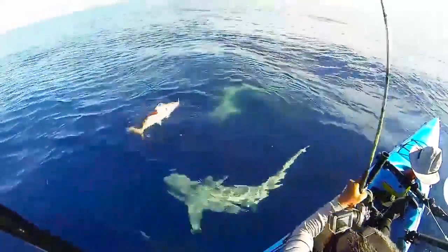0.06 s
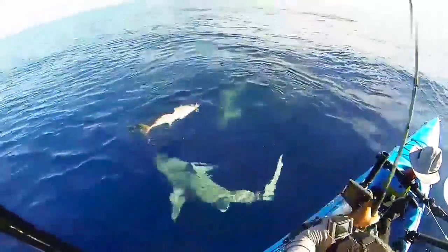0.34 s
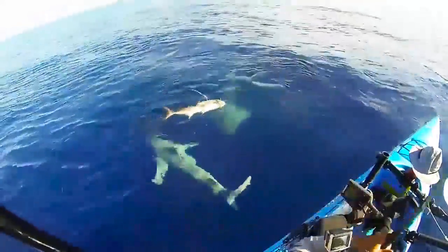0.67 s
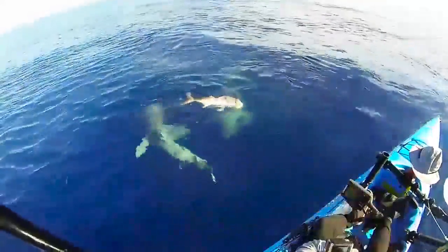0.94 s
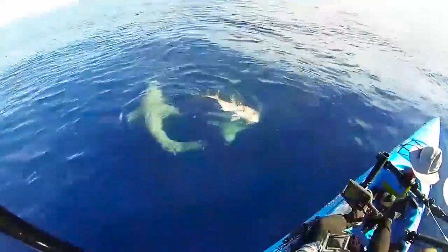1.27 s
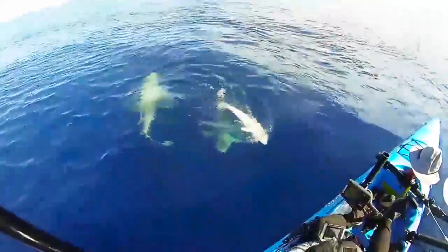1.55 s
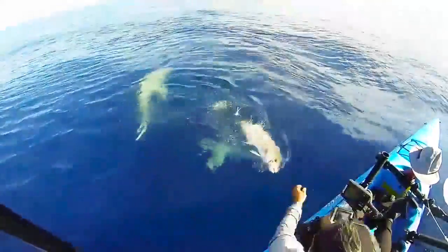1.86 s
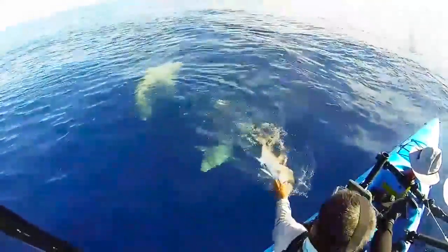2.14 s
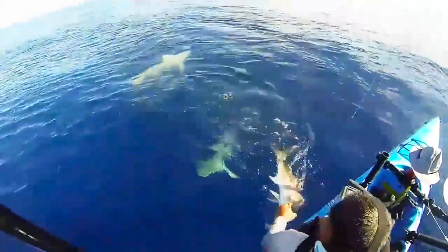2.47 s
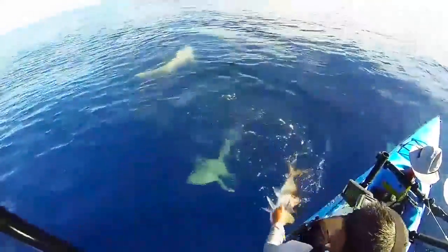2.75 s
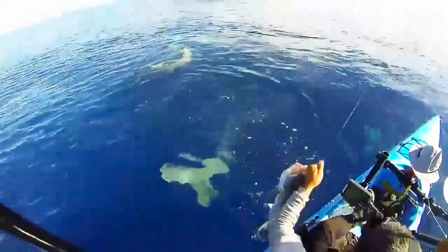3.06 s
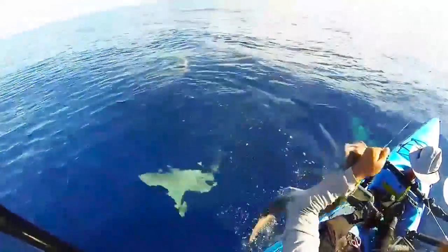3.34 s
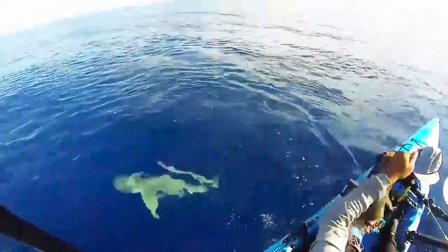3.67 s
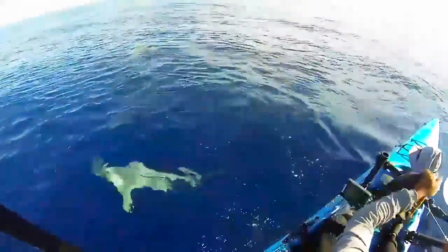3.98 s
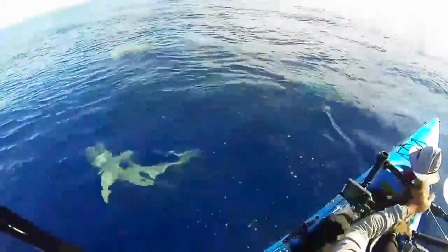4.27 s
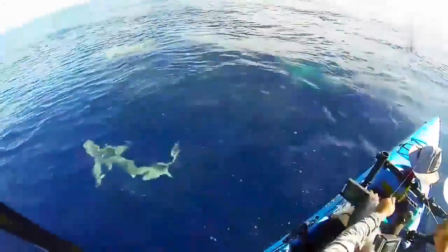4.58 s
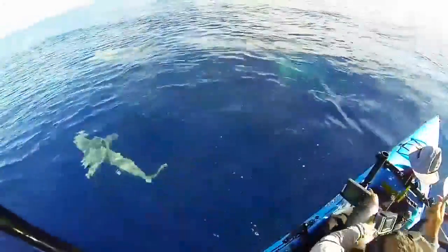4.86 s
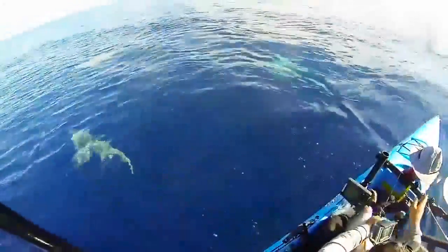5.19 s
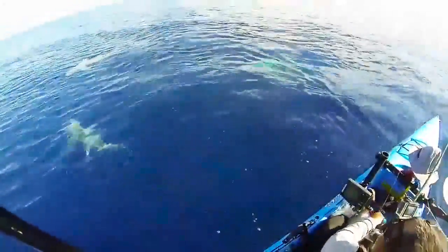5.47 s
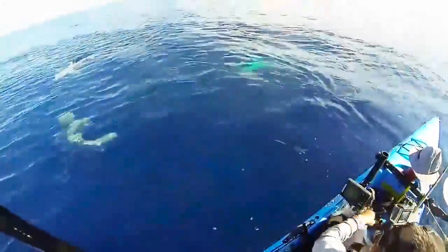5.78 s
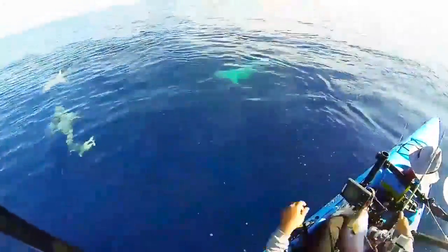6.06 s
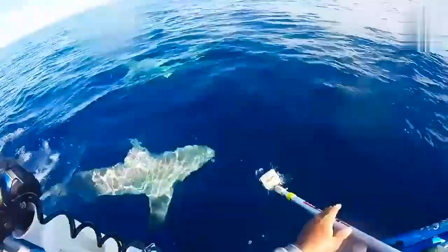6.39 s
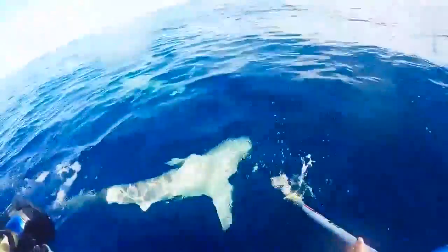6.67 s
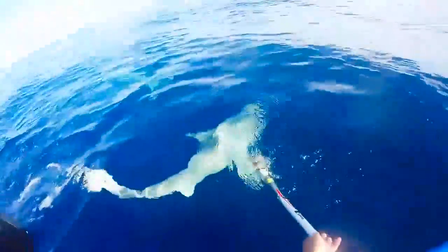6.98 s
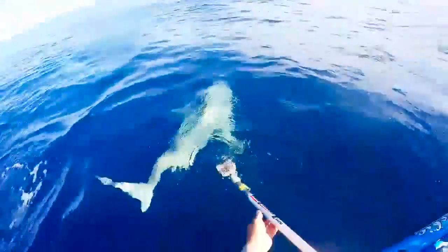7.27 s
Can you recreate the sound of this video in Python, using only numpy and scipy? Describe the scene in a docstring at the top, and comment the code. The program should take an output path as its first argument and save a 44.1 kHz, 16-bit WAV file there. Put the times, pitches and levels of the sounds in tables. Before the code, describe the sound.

On a calm sea, a plastic kayak hull rumbles and booms as an angler shifts about, heard muffled through a waterproof case on a pole. The mount ticks sharply while a fish hauled alongside splashes and gurgles dully. Heavier knocks and gear scuffs follow. Near the end the sound turns brighter and closer to the water, where a pole dips in with slaps, plops and fizzing squirts.

```python
"""Fishing from a kayak

On a calm sea, heard through a waterproof camera case on a pole, the plastic hull booms as the angler
shifts about, the mount slips with sharp ticks, and a fish hauled alongside splashes dully. Near the end
the sound switches to a brighter spot at the waterline, where a pole dips in with plops and squirts."""
import sys
import numpy as np
from scipy import signal
from scipy.fft import rfft, irfft, next_fast_len
from scipy.io import wavfile
from scipy.ndimage import uniform_filter1d

SR = 44100
rng = np.random.default_rng(int(sys.argv[2]) if len(sys.argv) > 2 else 0)


def store_pcm(level_fs):
    """Save levels as 16-bit WAV."""
    pcm = np.round(np.clip(level_fs, -1, 1) * 32767).astype(np.int16)
    wavfile.write(sys.argv[1], SR, np.atleast_2d(pcm).T)


N = 327663
TIME = np.arange(N) / SR

# Levels in a table compare its rows; the functions may turn a whole layer up or down.
# Tone of the steady hiss: pitch_hz, level_db
HISS_TONE = [(60, -13), (200, -1), (366, -9.5), (867, -16), (1500, -19.5), (2200, -22.5), (4600, -28.5),
             (6500, -32), (9000, -36), (12000, -41), (16000, -50)]
# Thin whines in the hiss: pitch_hz, width_hz, level_db
HISS_WHINES = [(4990, 230, -82.5), (10010, 1000, -82.5)]
# Tone of the open sea: pitch_hz, level_db
SEA_TONE = [(100, 5), (1000, -5.5), (4000, -9.5), (7000, -17), (14000, -22.5), (16000, -30)]
# Tone of water washing round the pole: pitch_hz, level_db
WASH_TONE = [(60, 10.5), (160, -6.5), (550, -13.5), (1200, -15.5), (2200, -5), (3500, -31), (6000, -26),
             (9000, -30), (16000, -48)]
# Foam fizzing up round the pole: middle_s, half_length_s, level_db
FOAM_SWELLS = [(6.76, 0.0087, -42.5), (6.995, 0.041, -52), (7.115, 0.069, -53), (7.345, 0.023, -49)]
# Water lapping at the hull: time_s, level_db
LAPPING_LEVELS = [(0.0, -74), (1.44, -68.5), (1.66, -63), (2.24, -57.5), (3.03, -67), (3.15, -61.5),
                  (4.52, -63), (4.76, -68), (5.18, -61.5), (5.4, -71), (5.97, -73), (6.55, -69)]
# Water surging round the fish and hull: middle_s, half_length_s, gurgle_db, spray_db
WATER_SURGES = [(1.496, 0.12, -69, -84), (1.673, 0.052, -76, -60), (1.82, 0.1, -67, -65),
                (2.026, 0.064, -62, -52), (2.504, 0.17, -82, -64), (3.233, 0.028, -55, -80),
                (3.376, 0.062, -53, -84), (4.635, 0.12, -67, -83), (6.438, 0.068, -59, -79)]
# Dull plops and taps by the hull: start_s, peak_db, pitch_hz
DULL_PLOPS = [(1.097, -51, 1540), (1.827, -47, 1120), (1.8753, -46, 1530), (2.0233, -46, 1530),
              (2.106, -41.5, 1630), (2.296, -44, 1340), (2.472, -44, 1260), (2.5956, -42, 1300),
              (2.762, -45.5, 1530), (2.9023, -46.5, 1540), (3.081, -43.5, 1350), (3.378, -39, 1550),
              (3.51, -39, 1530), (3.908, -42.5, 1420), (3.939, -35, 1485), (4.191, -48, 1560),
              (4.293, -46, 1460), (4.543, -44, 1240), (4.575, -39, 1420), (4.6266, -36.5, 1460),
              (4.674, -42.5, 1200), (5.304, -35.5, 1540), (5.323, -45.5, 1170), (6.0663, -46.5, 1450)]
# Water smacking the pole: start_s, level_db, fade_s, pitch_hz
WATER_SLAPS = [(6.6083, -32.5, 0.03, 3650), (6.618, -42, 0.024, 3570), (6.643, -52, .02, 2900),
               (6.7054, -46, 0.018, 4400), (6.7125, -48, 0.014, 6000), (6.7192, -40, 0.033, 1990),
               (6.7472, -36.5, 0.022, 1900), (6.755, -51, 0.04, 3600), (6.763, -37, 0.01, 6400),
               (6.775, -40, 0.031, 2180), (6.871, -46.5, 0.034, 1600), (6.973, -51, 0.053, 2670),
               (7.005, -51, 0.045, 3960), (7.1, -55, 0.43, 7440), (7.158, -53, 0.11, 11400)]
# Air pockets opening or pinching off: start_s, length_s, level_db, start_hz, middle_hz, end_hz, roughness
AIR_POCKETS = [(6.712, 0.0047, -24, 5000, 4200, 4000, 0.1), (6.716, 0.02, -35.5, 1600, 936, 640, 0.6),
               (6.754, .02, -38, 890, 596, 400, 0.8), (6.761, 0.06, -38.5, 294, 276, 268, 0.24),
               (6.868, 0.045, -47.5, 620, 588, 850, 0.8), (7.101, 0.011, -22.5, 3410, 3240, 3300, 0.06),
               (7.11, 0.026, -32.5, 3490, 3770, 4150, 0.34), (7.149, 0.035, -31, 5730, 5190, 6330, 0.22)]
# The fish splashing (first three rows), then gear brushing the deck: middle_s, half_length_s, level_db
GRITTY_SWELLS = [(1.678, 0.047, -64.5), (2.026, 0.078, -65.5), (2.502, 0.092, -67.5), (3.932, 0.061, -61),
                 (4.196, 0.029, -62.5), (4.257, 0.028, -63), (4.53, .04, -64.5), (4.575, 0.0057, -54),
                 (4.627, 0.004, -51.5), (4.655, 0.0059, -57.5), (4.95, 0.0091, -60.5),
                 (5.007, 0.026, -61.5), (5.082, 0.015, -58.5), (5.193, 0.036, -54)]
# Tone of those gritty swells: pitch_hz, level_db
GRIT_TONE = [(500, -10.5), (1400, 13.5), (2100, -1), (3100, -4), (4200, -10.5), (8000, -19.5),
             (11000, -21.5), (15000, -28.5)]
# Gear scuffing the deck: middle_s, half_length_s, level_db
DECK_SCUFFS = [(3.955, .04, -46), (4.21, 0.039, -53), (4.295, 0.024, -43.5), (4.58, 0.019, -44.5),
               (4.64, 0.035, -52), (5.05, 0.11, -61), (5.175, 0.037, -47.5), (6.02, 0.15, -62.5)]
# Notes the camera case rings at: pitch_hz, width_hz, level_db
CASE_NOTES = [(680, 160, -25), (1030, 130, -8), (1370, 210, 0), (1720, 280, -6), (2340, 180, -15),
              (2540, 270, -11), (3110, 270, -9), (4040, 600, -29), (4460, 250, -30), (5300, 520, -22),
              (5850, 280, -25), (6960, 900, -39), (8650, 420, -31), (10500, 3000, -46)]
# Slips of the mount: start_s, level_db, brightness_hz, snap_db (compared with the tick's peak)
MOUNT_SLIPS = [(0.2944, -21.5, 10000, -22.5), (0.54, -19.5, 4660, -33), (0.6626, -40.5, 1500, -40),
               (2.1414, -18, 5340, -29.5), (2.402, -15, 4960, -32), (2.6672, -16.5, 4420, -30),
               (2.974, -27.5, 6060, -23), (2.9866, -26, 6040, -31), (3.0976, -34.5, 1400, -40),
               (3.129, -22.5, 5000, -27), (3.1395, -22.5, 4970, -28), (3.274, -21.5, 6900, -26),
               (3.286, -28, 6000, -34), (3.2956, -21, 6900, -24), (4.3439, -18, 6900, -43),
               (4.3741, -26, 8000, -23), (5.1771, -4, 4800, -29), (5.2003, -14.5, 6000, -23.5),
               (6.0386, -37, 3500, -40)]
# Notes the hull rings at: pitch_hz, width_hz, level_db
HULL_NOTES = [(40.54, 34, -2), (77.7, 13, 3.5), (112, 25.3, -2), (188.3, 28.8, -6), (265, 64, -22.5),
              (485, 140, -19.5)]
# How hard the boat rocks the pole: time_s, level_db
ROCKING_LEVELS = [(0.0, -53), (0.2, -41.5), (0.44, -45.5), (0.95, -42), (1.09, -52), (1.22, -33.5),
                  (1.81, -48), (1.95, -37), (2.17, -43.5), (2.24, -29.5), (2.55, -39.5), (3.39, -30),
                  (3.63, -39.5), (4.1, -26), (5.05, -33), (5.14, -20.5), (5.86, -41.5), (6.55, -51.5)]
# The angler shifting his weight: start_s, hold_s, boom_db, shuffle_db
WEIGHT_SHIFTS = [(0.005, 0.049, -44.5, -46.5), (0.142, 0.035, -41, -44), (1.187, 0.055, -22.5, -35),
                 (1.336, .14, -45.5, -48), (1.566, .12, -40.5, -54), (1.956, .17, -37, -47.5),
                 (2.44, 0.1, -39, -48.5), (2.597, 0.091, -38.5, -42.5), (2.758, 0.095, -32.5, -46.5),
                 (3.129, 0.021, -33, -40), (3.37, 0.16, -44, -46.5), (3.751, .15, -36, -41),
                 (3.948, 0.03, -20.5, -29.5), (4.206, 0.13, -32.5, -34), (4.44, 0.25, -30.5, -35.5),
                 (4.999, 0.044, -18, -30.5), (5.076, 0.12, -24, -38.5), (5.324, .07, -26, -42),
                 (5.425, .09, -34, -44), (5.925, 0.092, -42.5, -47), (6.147, 0.14, -49, -51.5)]
# Bumps on the hull: start_s, peak_db, pitch_hz (a soft push is low)
HULL_BUMPS = [(0.109, -31.5, 125), (0.134, -33.5, 45.3), (.436, -47, 287), (0.487, -33, 182),
              (0.554, -29, 93), (0.717, -28, 111), (0.91, -34.5, 109), (1.151, -31.5, 186), (1.2, -29, 119),
              (1.212, -26, 44), (1.223, -45, 465), (1.278, -21, 83.6), (1.35, -28.5, 178), (2.214, -26, 42),
              (2.29, -24, 42.3), (2.818, -40, 250), (2.839, -25.5, 87), (3.166, -25.5, 61),
              (3.318, -20, 44.5), (3.938, -17, 88.4), (3.945, -19, 188), (3.984, -14, 77.4),
              (4.045, -22.5, 77.7), (4.264, -26.5, 188), (4.29, -19.5, 42.6), (4.48, -27.5, 190),
              (4.574, -37.5, 484), (4.989, -15.5, 120), (4.991, -25.5, 280), (5.126, -12, 66.4),
              (5.153, -13.5, 66), (5.351, -21.5, 130), (5.965, -43.5, 190), (5.975, -45, 292),
              (6.099, -43, 127), (6.299, -44, 192)]


def from_db(db):
    """Turn decibels into a gain."""
    return 10 ** (np.asarray(db) / 20)


def rms_one(x):
    """Scale a sound so its average strength (rms) is 1."""
    return x / np.sqrt(np.mean(x ** 2) + 1e-20)


def noise(length=N):
    """Plain white noise."""
    return rng.standard_normal(length)


def add(out, start_s, sound):
    """Mix a sound in at a given time."""
    at = int(start_s * SR)
    out[at:at + len(sound)] += sound[:N - at]


def cut(x, hz, keep, order=2):
    """Keep the "low" or the "high" side of a pitch."""
    sections = signal.butter(order, np.clip(hz, 10, .45 * SR), keep, fs=SR, output="sos")
    return signal.sosfilt(sections, x + 1e-18)


def resonate(x, hz, width_hz):
    """Make a sound ring near one pitch; a narrow width rings longer."""
    r = np.exp(-np.pi * width_hz / SR)
    poles = [1, -2 * r * np.cos(2 * np.pi * hz / SR), r * r]
    return signal.lfilter(np.array([1, 0, -1]) * (1 - r * r) / 2, poles, x + 1e-18)


def resonate_twice(x, hz, width_hz):
    """Ring twice over, so less gets through away from the pitch."""
    return resonate(resonate(x, hz, width_hz), hz, width_hz)


def smear(x, hz, width_hz):
    """Bending waves near one pitch arrive a little late."""
    r = np.exp(-np.pi * width_hz / SR)
    poles = [1, -2 * r * np.cos(2 * np.pi * hz / SR), r * r]
    return signal.lfilter(poles[::-1], poles, x)


def body(x, notes, size=16384):
    """Send a sound through an object that rings at several notes."""
    bin_hz = np.arange(size // 2 + 1) * SR / size
    gain = sum(from_db(db) / (1 + (2 * (bin_hz - hz) / width) ** 2) for hz, width, db in notes)
    # Minimum phase: the ringing comes after the hit, never before.
    cepstrum = irfft(np.log(gain)) * (1 + np.sign(size // 2 - np.arange(size)))
    cepstrum[0] /= 2
    ring = irfft(np.exp(rfft(cepstrum)))
    return signal.fftconvolve(x, ring)[:len(x)]


def colour(x, tone):
    """Shape the lows and highs of a steady sound with a tone table."""
    hz, db = np.transpose(tone)
    size = next_fast_len(N)
    log_hz = np.log(np.arange(size // 2 + 1) * SR / size + 1)
    gain = from_db(np.interp(log_hz, np.log(hz), db))
    return rms_one(irfft(rfft(x, size) * gain, size)[:N])


def even(x, span_s):
    """Even out a sound so its strength stays near 1."""
    size = int(span_s * SR) + 1
    power = uniform_filter1d(uniform_filter1d(x * x, size), size)
    return x / np.sqrt(np.abs(power) + 1e-3 * np.mean(x * x))


def curve_db(rows):
    """Join time_s, level_db points with straight lines."""
    return np.interp(TIME, *np.transpose(rows))


def swells(rows):
    """Smooth rises and falls from rows of middle_s, half_length_s, level_db."""
    return sum(from_db(db) * np.exp(-2 * np.minimum(((TIME - s) / half_s) ** 2, 20))
               for s, half_s, db in rows)


def waver(rate_hz, depth_db):
    """A slow random rise and fall in strength."""
    slow = cut(noise(N + SR), rate_hz, "low")[SR:]
    return from_db(depth_db * rms_one(slow))


def grains(per_s, spread_db):
    """Tiny random hits of uneven size."""
    sizes = from_db(spread_db * np.minimum(rng.exponential(1, N), 4)) * rng.choice([-1, 1], N)
    return rms_one(sizes * (rng.random(N) < per_s / SR))


def bubbles(per_s, low_hz, high_hz, cycles, spread_db):
    """Bubbles form at random; each swells, then fades as its pitch rises."""
    out = np.zeros(N)
    for when, pitch, chance in rng.random((int(per_s * N / SR), 3)):
        hz = low_hz * (high_hz / low_hz) ** pitch
        length = int(cycles * SR / hz)
        age = np.arange(length) / length
        size = from_db(spread_db * min(-np.log(1 - chance), 3))
        swell = np.minimum(12 * age, 1) * np.exp(-5.5 * age)
        add(out, when * N / SR, size * swell * np.sin(2 * np.pi * cycles * age * (1 + age / 8)))
    return rms_one(out)


def hiss(level_db=-61):
    """An even hiss with two faint high whines."""
    whines = sum(from_db(db) * rms_one(resonate_twice(noise(), hz, width))
                 for hz, width, db in HISS_WHINES)
    return from_db(level_db) * colour(noise(), HISS_TONE) + whines


def waterline(dip_s=6.68, wash_db=-51, rise_db_per_s=10, settle_db_per_s=23, rock_db=-37.5, sea_db=-59.5):
    """The boat rocks and the sea hisses; water washes and fizzes as the pole dips in, then settles."""
    since_dip = TIME - dip_s
    wash_gain = from_db(wash_db + np.minimum(rise_db_per_s * since_dip, -settle_db_per_s * since_dip))
    fizz_gain = from_db(-8.5) * wash_gain + swells(FOAM_SWELLS)
    rocking = even(cut(resonate(noise(), 22.5, 10), 55, "low", order=4), 0.087)
    drips = bubbles(200, 500, 5000, cycles=22, spread_db=3)
    wash = colour(noise() + .5 * drips, WASH_TONE)
    foam = rms_one(resonate(resonate(noise(), 3740, 1700), 3730, 1600))
    fizz = even(bubbles(330, 2400, 5000, cycles=40, spread_db=2.5) + 1.2 * foam, .04)
    sea = from_db(sea_db) * colour(noise(), SEA_TONE)
    return from_db(rock_db) * rocking + wash_gain * wash + fizz_gain * fizz + sea


def muffled_water(still_db=-73.5):
    """Gurgles and falling spray round the fish and hull, heard through the ringing case."""
    lap_power = np.maximum(from_db(curve_db(LAPPING_LEVELS)) ** 2 - from_db(still_db) ** 2, 0)
    lapping = from_db(2) * np.sqrt(lap_power) * waver(11, depth_db=3)
    gurgle_gain = lapping + swells([(s, half_s, db) for s, half_s, db, _ in WATER_SURGES])
    spray_gain = from_db(-10) * lapping + swells([(s, half_s, db) for s, half_s, _, db in WATER_SURGES])
    churn = rms_one(resonate(noise(), 1470, 350))
    bubbling = bubbles(260, 950, 1670, cycles=29, spread_db=2.2)
    gurgle = rms_one(cut(body(bubbling + from_db(2) * churn, CASE_NOTES), 1100, "high"))
    drips = bubbles(140, 2000, 4400, cycles=45, spread_db=3.5)
    spray = rms_one(cut(body(drips + from_db(-0.5) * noise(), CASE_NOTES), 1200, "high", order=4))
    return from_db(-3.5) * gurgle_gain * gurgle + from_db(-7) * spray_gain * spray


def plops(fade_s=0.027, width_share=0.064):
    """A blob of water or a soft tap sets the case ringing near one pitch."""
    out, t = np.zeros(N), TIME[:SR // 10]
    for start_s, db, hz in DULL_PLOPS:
        patter = from_db(-60 * t / fade_s) * noise(len(t))
        plop = body(resonate(patter, hz, width_share * hz), CASE_NOTES)
        add(out, start_s, from_db(db) * plop / np.abs(plop).max())
    return out


def slaps(width_share=0.15):
    """Water smacks the pole in bursts of spatter that die quickly."""
    out, t = np.zeros(N), TIME[:SR // 8]
    for start_s, db, fade_s, hz in WATER_SLAPS:
        spatter = even(resonate(noise(len(t)), hz, width_share * hz), 0.0045)
        add(out, start_s, from_db(db - 60 * t / fade_s) * spatter)
    return out


def air_pockets(overtone_db=-19, flutter_hz=500, fade_db=14, ramp_share=0.27):
    """A pocket of air sings at a pitch that follows its size; its torn rim makes the tone flutter."""
    out = np.zeros(N)
    for start_s, length_s, db, start_hz, middle_hz, end_hz, roughness in AIR_POCKETS:
        age = np.linspace(0, 1, int(length_s * SR))
        hz = np.polyval(np.polyfit([0, .5, 1], [start_hz, middle_hz, end_hz], 2), age)
        rate_hz = min(flutter_hz, middle_hz / 4)
        flutter, wobble = (rms_one(cut(noise(SR // 4), rate_hz, "low"))[-len(age):] for _ in range(2))
        phase = 2 * np.pi * np.cumsum(hz) / SR + 2 * roughness * wobble
        tone = np.sin(phase) + from_db(overtone_db) * np.sin(2 * phase)
        swell = np.minimum(np.minimum(age, 1 - age) / ramp_share, 1) * from_db(db - fade_db * age)
        add(out, start_s, swell * (1 + roughness * flutter) * tone)
    return out


def gritty_swells():
    """Short gritty swells: the fish splashing, then gear brushing the deck."""
    return from_db(8) * swells(GRITTY_SWELLS) * colour(grains(1300, spread_db=2.2), GRIT_TONE)


def scuffs():
    """Gear dragged over the deck knocks on the hull's highest note."""
    knocks = cut(body(grains(130, spread_db=14), HULL_NOTES), 420, "high", order=6)
    return from_db(0.5) * swells(DECK_SCUFFS) * even(knocks, 0.046)


def mount_ticks(creep_s=.003, creep_db=-42, echo_s=.00292, echo_share=0.06,
                rattle_db=-48, rattle_fade_s=0.07, snap_fade_s=0.034):
    """The mount creeps, snaps, rings the case, echoes along the pole and leaves a faint rattle."""
    out, snap_at = np.zeros(N), int(creep_s * SR)
    t = TIME[:SR // 10] - snap_at / SR
    for start_s, db, bright_hz, snap_db in MOUNT_SLIPS:
        slip = from_db(np.where(t < 0, creep_db, rattle_db - 60 * t / rattle_fade_s)) * noise(len(t))
        slip[snap_at] += 1
        slip[snap_at + int(echo_s * SR)] += echo_share
        ringing = body(cut(cut(slip, bright_hz, "low"), 680, "high", order=4), CASE_NOTES)
        tick = smear(smear(ringing, 2550, 790), 5690, 670)
        crack = cut(resonate(noise(len(t)), 4900, 3500), 11000, "low")
        snap = (t >= 0) * from_db(snap_db - 60 * np.abs(t) / snap_fade_s) * crack
        add(out, start_s - creep_s, from_db(db) * (tick / np.abs(tick).max() + snap))
    return out


def pole_sway(pitch_hz=41, width_hz=14):
    """The rocking boat makes the pole nod at its own low note."""
    gain = from_db(curve_db(ROCKING_LEVELS)) * waver(20, depth_db=1.5)
    return gain * even(resonate_twice(noise(), pitch_hz, width_hz), 0.044)


def hull_rumble(gentle_db=-37.5, follow_share=.4, rise_s=0.037, fade_db_per_s=219.5):
    """The hull murmurs as it rocks, and booms and shuffles when the angler shifts his weight."""
    murmur = from_db(follow_share * (curve_db(ROCKING_LEVELS) - gentle_db))
    boom_gain, shuffle_gain = from_db(-46) * murmur, from_db(-57.5) * murmur
    for start_s, hold_s, boom_db, shuffle_db in WEIGHT_SHIFTS:
        rise = np.clip((TIME - start_s) / rise_s + 1, 0, 1)  # full strength at start_s
        push = rise * from_db(-fade_db_per_s * np.clip(TIME - start_s - hold_s, 0, 1))
        boom_gain = np.maximum(boom_gain, from_db(boom_db) * push)
        shuffle_gain = np.maximum(shuffle_gain, from_db(shuffle_db) * push)
    drone = body(noise(), HULL_NOTES)
    boom = even(cut(cut(drone, 79, "high", order=4), 137, "low", order=4), 0.058)
    patter = body(grains(500, spread_db=4.6), HULL_NOTES)
    shuffle = even(cut(cut(patter, 157, "high", order=6), 255, "low", order=3), 0.042)
    return from_db(-2.5) * boom_gain * boom + from_db(-3) * shuffle_gain * shuffle


def hull_bumps(width_share=0.56):
    """A knee or elbow pushes once, and the hull booms on."""
    out, hit = np.zeros(N), signal.unit_impulse(SR // 3)
    for start_s, db, hz in HULL_BUMPS:
        push = resonate_twice(hit, hz, width_share * hz)
        boom = body(cut(push, hz / 2, "high"), HULL_NOTES)
        add(out, start_s, from_db(db) * boom / np.abs(boom).max())
    return out


def scene(switch_s=6.562, blend_s=0.016):
    """Listen from the case on the pole, then from the waterline, in one channel."""
    boat = pole_sway() + hull_rumble() + scuffs() + hull_bumps() + mount_ticks()
    on_pole = boat + plops() + muffled_water() + gritty_swells() + hiss()
    near_water = waterline() + slaps() + air_pockets()
    switched = np.clip((TIME - switch_s) / blend_s + .5, 0, 1)
    return ((1 - switched) * on_pole + switched * near_water)[None]


def record(dry, top_hz=15900):
    """Cut off the very highest treble steeply."""
    return signal.sosfilt(signal.ellip(10, .1, 80, top_hz, fs=SR, output="sos"), dry)


dry = scene()
out = record(dry)
store_pcm(out)
```